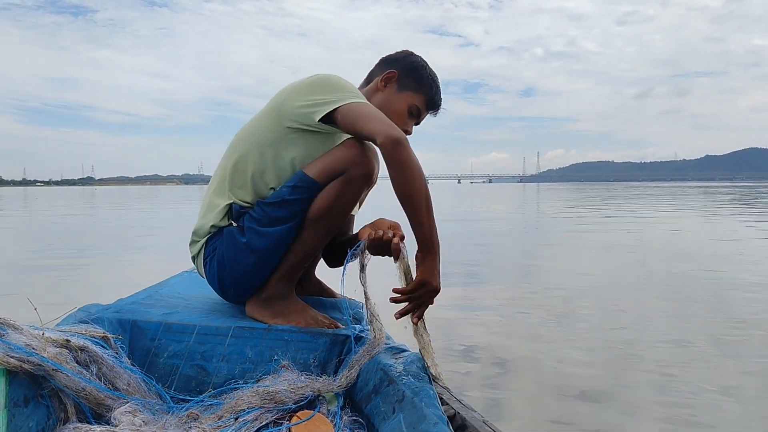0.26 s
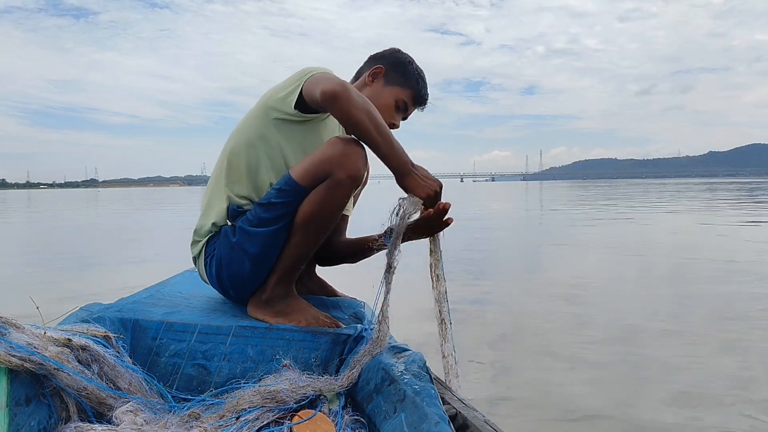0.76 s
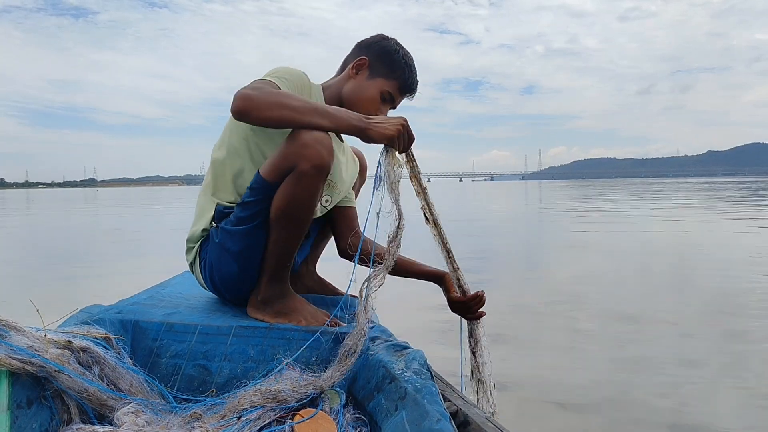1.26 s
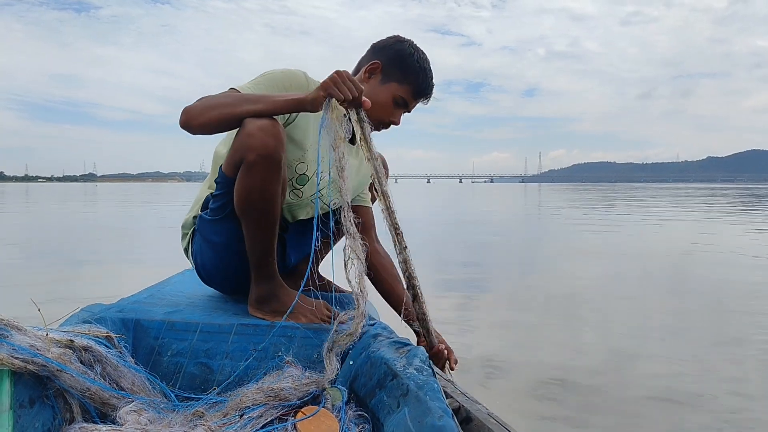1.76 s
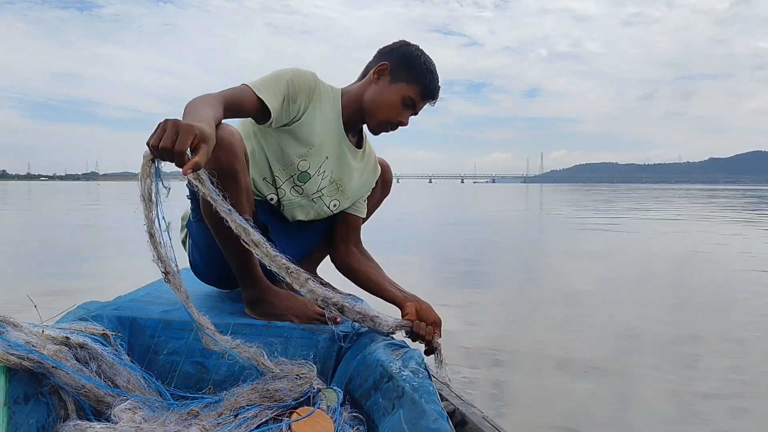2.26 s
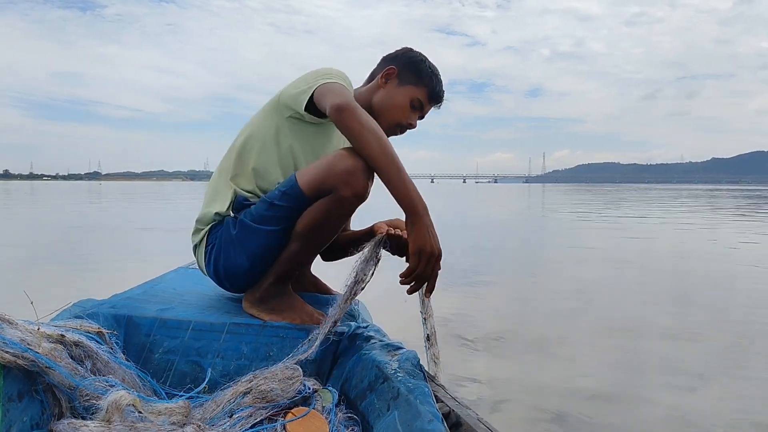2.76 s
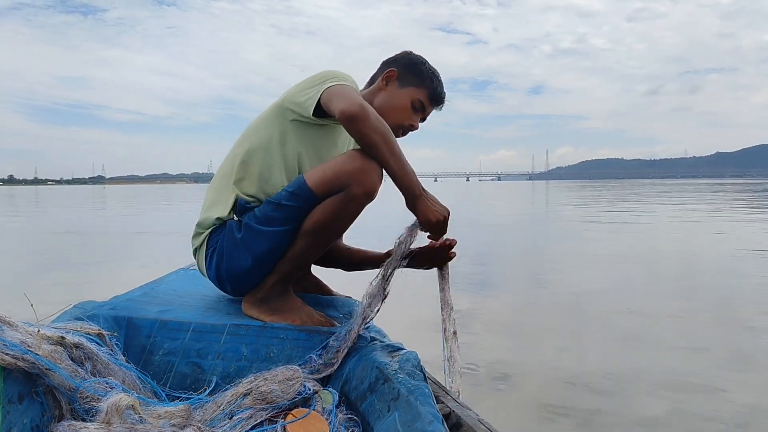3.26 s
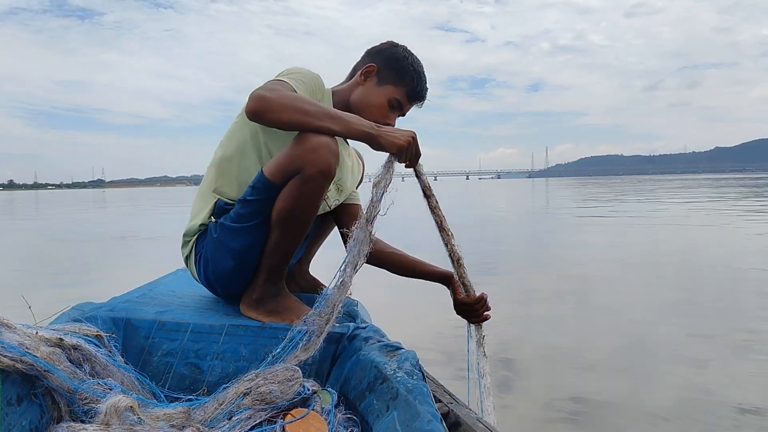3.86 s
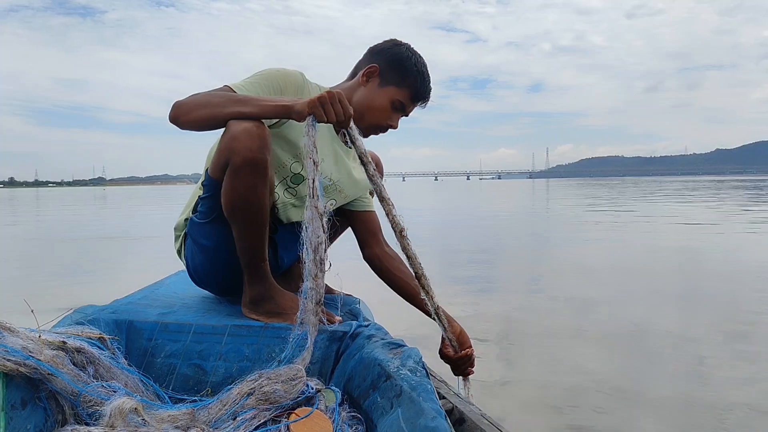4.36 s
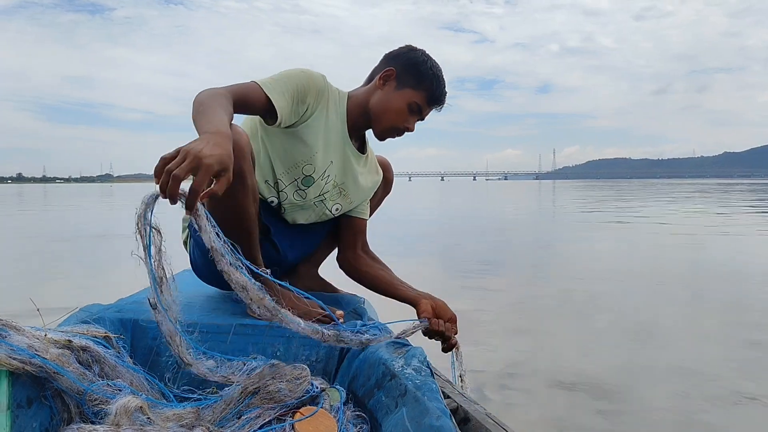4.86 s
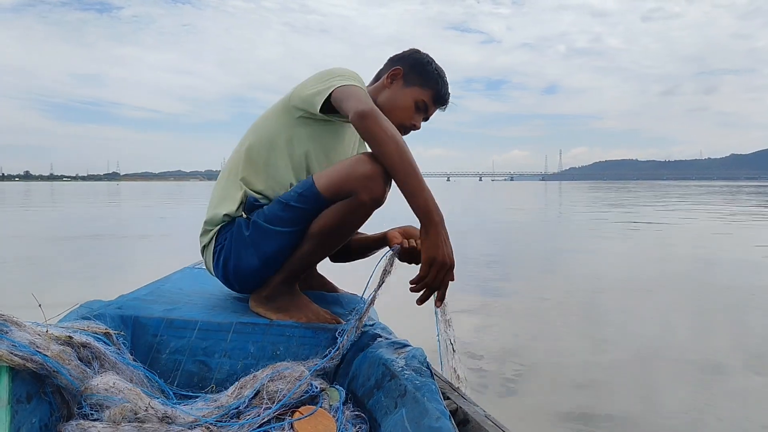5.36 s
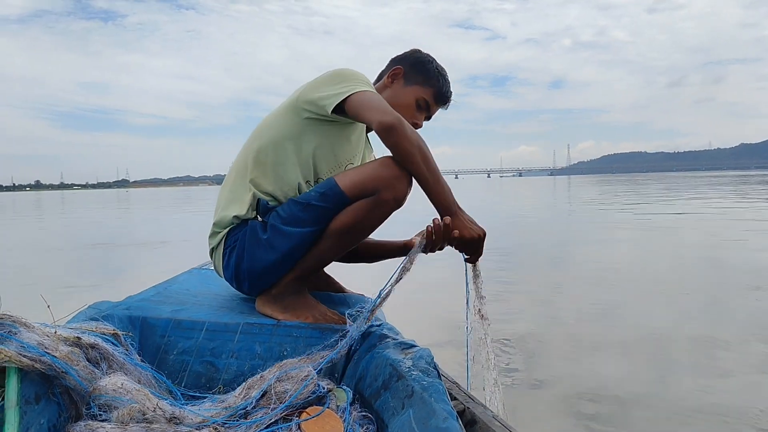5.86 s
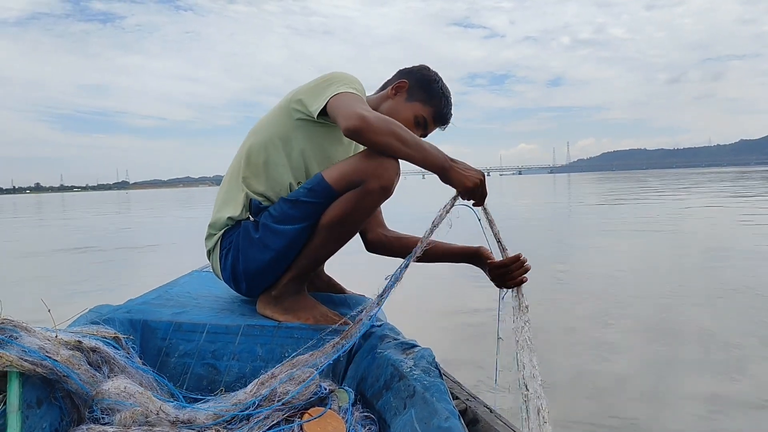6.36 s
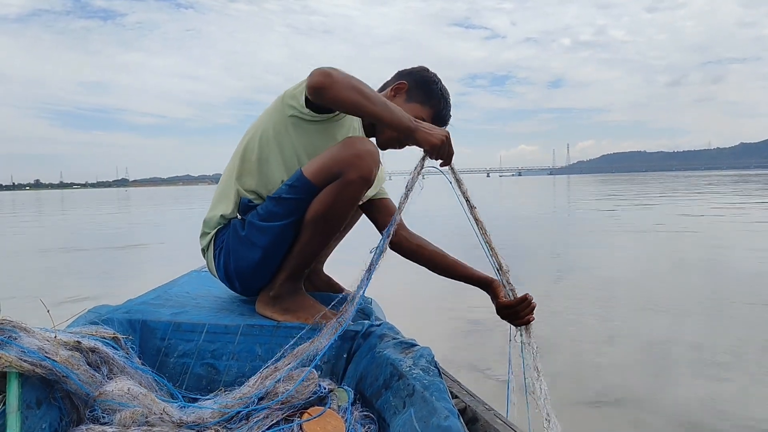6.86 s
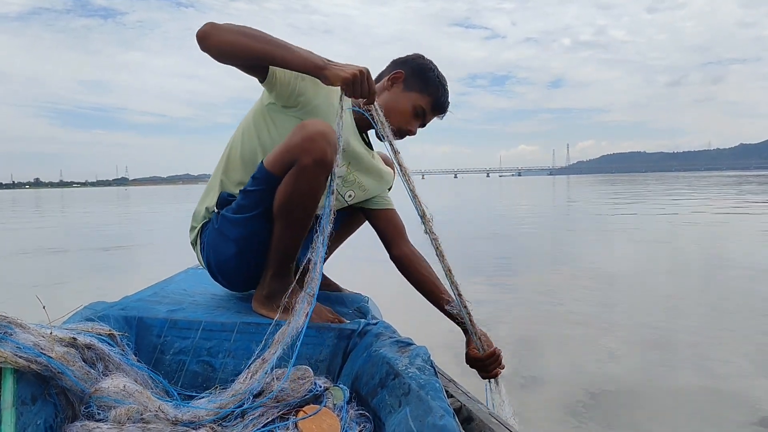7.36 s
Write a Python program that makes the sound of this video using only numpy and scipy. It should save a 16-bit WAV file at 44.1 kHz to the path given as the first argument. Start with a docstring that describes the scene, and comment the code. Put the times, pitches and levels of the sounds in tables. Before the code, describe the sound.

Outdoors on calm open water, close stereo microphone on a small wooden boat. A wet net is pulled in by hand: fine spray and mesh crackle rise and fall with each pull, and drips and bubbly plops cluster around two seconds. A soft hollow hull knock follows near three, then more trickling and a short rasp of cord on wood. A quieter lull ends with renewed drips and a fainter rasp. Steady low rumble and light deep breeze lie behind.

```python
"""Water draining as a random crowd of bursts from a wet net hauled by hand over the side of a wooden boat.
Mesh snaps and drops are short rings and noise puffs; bubbles and trickles are decaying tones of moving pitch.
The mesh swishes as gliding narrow-band noise; the cord's slips and the knocks excite plank and hull modes.
Behind them lie a light breeze of deep, band-passed pressure lumps and a far, steady rumble,
shaped noise partly alike at two spaced microphones."""
import sys
import numpy as np
from scipy import signal
from scipy.fft import rfft, irfft, next_fast_len
from scipy.io import wavfile
from scipy.ndimage import uniform_filter1d

SR = 44100
rng = np.random.default_rng(int(sys.argv[2]) if len(sys.argv) > 2 else 0)


def file_out(sig):
    """Save sig as 16-bit WAV at sys.argv[1]."""
    # one column per channel
    cols = np.atleast_2d(sig).T
    # limit, then scale
    lim = np.clip(cols, -1, 1)
    pcm = np.round(lim * 32767).astype(np.int16)
    wavfile.write(sys.argv[1], SR, pcm)


N = 335424  # length in samples


def gain_of(db):
    """Decibel law: amplitude ratio of a level in dB."""
    return 10 ** (np.asarray(db) / 20)


def evened(x):
    """Normalisation: scales a signal to unit root-mean-square."""
    return x / np.sqrt(np.mean(x ** 2) + 1e-20)


def read(points, hz):
    """Interpolation of a spectrum along logarithmic frequency."""
    f, value = np.transpose(points)
    return np.interp(np.log(hz + 1), np.log(f + 1), value)


def follow(rows):
    """Amplitude envelope: gain at every sample along a (t/s, level/dB) curve."""
    s, db = np.transpose(rows)
    return gain_of(np.interp(np.arange(N) / SR, s, db))


def joined(tables):
    """Concatenated envelopes: one (t/s, level/dB) curve, almost silent between its parts."""
    curve = []
    for rows in tables:
        before, after = (rows[0][0] - .02, -100), (rows[-1][0] + .02, -100)
        curve += [row[:2] for row in (before, *rows, after)]
    return curve


def add(mix, s, sound, pan_db):
    """Superposition: adds a sound at time s with a left-minus-right level difference."""
    part = mix[:, round(s * SR):][:, :sound.shape[-1]]
    part += gain_of([[pan_db / 2], [-pan_db / 2]]) * sound[..., :part.shape[1]]


def colour(x, points, lean):
    """Linear filtering: shapes a pair by a spectrum and a lean between the microphones."""
    size = next_fast_len(N)
    hz = np.fft.rfftfreq(size, 1 / SR)
    response_db = read(points, hz) + np.outer([.5, -.5], read(lean, hz))
    return irfft(rfft(x, size) * gain_of(response_db), size)[:, :N]


def band(x, hz, spread):
    """Resonant selection: twice a gentle band-pass, spread times above and below hz, then evened."""
    edges = signal.butter(1, [hz / spread, min(hz * spread, 20000)], "band", fs=SR)
    return evened(signal.lfilter(*edges, signal.lfilter(*edges, x)))


# water draining from the lifted mesh, also setting the crackle and stray drops: [t/s, level/dB]
DRAIN_LEVEL = [(0, -92), (.27, -84.5), (.34, -73.5), (.68, -84), (.8, -88), (.88, -78.5), (1.25, -74.5),
               (1.47, -76), (1.6, -85), (1.76, -75), (2.0, -77.5), (2.15, -82), (2.43, -85), (2.52, -78.5),
               (2.87, -88), (3.15, -86.5), (3.175, -76), (3.21, -84), (3.34, -87), (3.4, -79.5),
               (3.46, -86.5), (3.53, -84), (3.77, -78), (4.03, -80), (4.24, -82), (4.5, -74.5),
               (4.65, -71.5), (4.68, -86.5), (4.86, -81.5), (5.33, -85), (5.6, -90.5), (6.15, -90),
               (6.25, -87), (6.92, -82.5), (7.25, -83.5), (7.5, -77.5), (7.61, -88)]
# spectra of the fine spray and of the coarser spatter: [f/Hz, relative level per Hz/dB]
SPRAY_SPECTRUM = [(4000, -14), (6500, -4.5), (8000, -3.5), (10000, -5.5), (12500, -10), (16000, -27)]
SPATTER_SPECTRUM = [(2000, -6.5), (3000, -4), (3700, -3), (5000, -5.5), (6500, -4.5), (9000, -10.5)]
# lean of near sound between the microphones: [f/Hz, left minus right level/dB]
NEAR_LEAN = [(500, 4), (2000, 9), (5500, -2), (7500, -1.5), (9500, 14.5), (13000, 3.5)]
SPATTER_DB, SURGE_DB = 2, 1.2  # spatter against the spray; depth of the slow surges of both


def fizz():
    """Poisson process: thousands of tiny bursts a second, flickering as threads of water break."""
    out = 0
    for db, spectrum in (0, SPRAY_SPECTRUM), (SPATTER_DB, SPATTER_SPECTRUM):
        flicker_db = 1.4 * evened(uniform_filter1d(rng.standard_normal(N), size=300))
        surge_db = SURGE_DB * evened(uniform_filter1d(rng.standard_normal(N), size=2500))
        strength = gain_of(2.8 * np.minimum(rng.exponential(1, N), 5) + flicker_db)
        impulses = strength * (rng.random(N) < 1400 / SR)  # 1400 bursts/s in each layer
        shared, left, right = rng.standard_normal((3, N))
        noise = 0.4 * shared + np.array([left, right])
        bursts = colour(uniform_filter1d(impulses, size=40) * noise, spectrum, NEAR_LEAN)
        out = out + gain_of(db + surge_db) * bursts / np.std(bursts.mean(0))
    return follow(DRAIN_LEVEL) * out


# spectral weighting of the snapping mesh: [f/Hz, level/dB]
SNAP_SPECTRUM = [(3000, 1), (5000, 1.5), (7000, -4), (10000, -2), (14000, -6)]
# level against the drain curve in dB, snaps per second, cycles for a ring's envelope to fall by exp(-6)
CRACKLE_DB, CRACKLE_PER_S, CRACKLE_CYCLES = -4.5, 1200, 21


def crackle():
    """Impulse response: meshes snap open as short rings of scattered pitch, a few much louder."""
    out, t = np.zeros((2, N)), np.arange(400) / SR
    for hz in np.geomspace(3200, 13500, num=20):
        strength = gain_of(3.3 * np.minimum(rng.exponential(1, N), 4))
        snaps = strength * (rng.random(N) < CRACKLE_PER_S / 20 / SR)  # shared among 20 pitches
        sides = snaps * gain_of(2.8 * rng.standard_normal((2, N))) * rng.choice([-1., 1.], (2, N))
        envelope = t * hz * np.exp(-t * hz * 6 / CRACKLE_CYCLES)
        ring = envelope * np.sin(2 * np.pi * hz * t)
        out += signal.oaconvolve(sides, evened(ring)[None])[:, :N]
    out = colour(out, SNAP_SPECTRUM, NEAR_LEAN)
    return follow(DRAIN_LEVEL) * gain_of(CRACKLE_DB) * out / np.std(out.mean(0))


# small random drops: rate per second, level against the drain curve in dB, exponential spread in dB
STRAYS_PER_S, STRAY_DB, STRAY_SPREAD_DB = 40, -2.5, 1.5


def strays():
    """Random arrivals: rows of small ticks whose level follows the draining."""
    when, size, pitch, edge = rng.random((round(STRAYS_PER_S * N / SR), 4)).T
    s, hz = when * N / SR, 3500 * 3 ** pitch
    excess_db = -STRAY_SPREAD_DB * np.log(np.maximum(size, .15))
    db = np.interp(s, *np.transpose(DRAIN_LEVEL)) + STRAY_DB + excess_db
    return list(zip(s, db, hz, -8.0 * edge, .5 * read(NEAR_LEAN, hz)))


# drops striking water and deck:
# [t/s, level/dB, centre f/Hz, bright edge against the centre level/dB, left minus right level/dB]
DROP_TICKS = [(.337, -63.5, 10500, -13, 13), (0.8733, -69, 3600, 2, 7), (0.9064, -69.5, 3600, 4.5, 6),
              (1.0027, -63.5, 6100, -5, 1), (1.165, -65, 8250, -8, 5), (1.316, -59, 3670, -23, -11),
              (1.326, -56.5, 3640, -24, 7), (1.412, -63, 6500, -10, -1), (1.5277, -63, 3820, -9, 2),
              (1.6186, -57, 5000, -8, -3), (1.7169, -41, 4180, -8, -1), (1.7173, -45.5, 8600, -14, 3),
              (1.7176, -58, 15000, -20, 2), (1.7292, -66, 8800, -15, 3), (1.7639, -60, 4120, -13, -5),
              (1.844, -57.5, 3700, -10, -4), (1.851, -59.5, 5600, -20, -8), (1.886, -60, 6500, -16, -4),
              (1.928, -70, 6170, -2, -2), (2.0164, -68.5, 8050, 2, 6), (2.0597, -67, 6750, -8, -1),
              (2.177, -61, 3200, -9, 0), (2.1817, -73, 9300, -3, 3), (2.185, -63, 3100, -12, 0),
              (2.1895, -69, 6000, -6, -4), (2.192, -64, 2700, -12, 0), (2.197, -62, 5900, -14, -2),
              (2.202, -58, 3300, -14, -2), (2.2085, -64, 2900, 0, 0), (2.218, -62, 4400, -7, -3),
              (2.226, -67, 3100, -4, 0), (2.324, -71, 6000, -4, 0), (2.4566, -66, 6900, -4, -3),
              (2.504, -65, 10300, -8, 12), (2.789, -70, 5600, -15, 0), (2.908, -78, 9050, -12, 3),
              (2.972, -74, 8300, -10, 3), (3.0138, -72.5, 4970, 0, 2), (3.159, -80, 9500, -4, 5),
              (3.168, -71, 13500, -7, 3), (3.177, -79, 9400, -5, 5), (3.186, -73, 6800, -8, 3),
              (3.2, -76, 11000, -7, 5), (3.2495, -74, 6800, 5, -3), (3.2515, -66, 2800, -2, -8),
              (3.253, -64, 4450, -8, -11), (3.2524, -63, 5900, -6, -5), (3.257, -67, 4400, -2, -5),
              (3.2605, -65, 2700, -2, -2), (3.266, -71, 7500, -2, 2), (3.272, -69, 4500, -6, -2),
              (3.3517, -65, 14300, -13, 6), (3.3835, -72, 8070, -7, -1), (3.436, -67, 12000, -3, 2),
              (3.799, -60.5, 4740, -2, -4), (3.921, -60, 3560, -6, -2), (3.9697, -67, 8870, -7, 2),
              (4.0158, -65.5, 9400, -10, 10), (4.2807, -62, 6860, -12, -2), (4.296, -61, 4910, -14, -6),
              (4.347, -65, 4910, -2, -3), (4.407, -53.5, 5300, -25, -7), (4.4747, -46, 5450, -23, 1),
              (4.619, -51.5, 3670, -12, 1), (4.743, -62, 4170, -10, 3), (4.777, -60, 6540, -7, -1),
              (4.782, -58, 5050, -13, -5), (4.8183, -61.5, 4160, -3, 2), (5.3538, -53, 10900, 1.5, -2),
              (5.362, -62, 9800, -3, -11), (5.371, -63, 9790, -7, 4), (6.126, -77, 8140, 4, 5),
              (6.519, -69, 4400, -15, -3), (6.596, -68, 4900, -15, -3), (6.672, -70, 5800, -12, -3),
              (6.9286, -66.5, 9000, -11, 8), (7.016, -71, 4000, -10, 0), (7.037, -63, 4890, -13, -6),
              (7.094, -68, 5500, -10, -3), (7.1444, -70, 7970, 1, 3), (7.1565, -63, 7840, 3, -2),
              (7.532, -65.5, 8600, -8, 8), (7.563, -70, 5500, -2, 3)]
TICK_T60_S = 0.014


def drops():
    """Impact noise: a puff around its centre plus a bright edge, unlike in the two microphones."""
    out, t, ticks = np.zeros((2, N)), np.arange(1500) / SR, strays() + DROP_TICKS
    puffs = rng.standard_normal((len(ticks), 2, 1500))
    for (s, db, hz, edge_db, pan_db), puff in zip(ticks, puffs):
        puff[[0, 1], [8, 14]] += 8  # first contact is one sharp edge, a little later on the right
        edge = gain_of([[3], [-6]]) * band(puff, 8600, 1.32) + 0.36 * band(puff, 5000, 1.9)
        spread = 1.17 + .012 * max(db + 52, 0)  # a hard drop cracks over a wider band
        tick = band(puff, hz, spread) + gain_of(edge_db) * edge
        onset = np.minimum(t / .0002, 1)
        add(out, s, gain_of(db - 60 * t / TICK_T60_S) * tick * onset, pan_db)
    return out


BUBBLE_ROUGH = 0.22  # rms flutter of a ring, as a share of its amplitude


def bubble(hz, t60, rise, punch, rough):
    """Bubble resonance: a dying tone of moving pitch, with a falling plop where the drop hits hard."""
    t = np.arange(len(rough)) / SR
    settle = .35 * punch * np.exp(-t / .0013)
    # the rise reaches its stated share a third into the ring, and bends later for long rings
    drift = rise * np.minimum(3 * t / t60, 1.15) ** (1 + 22 * t60)
    turns = np.cumsum(hz * (1 + settle + drift)) / SR
    flutter = 1 + BUBBLE_ROUGH * band(rough, .15 * hz, 2.5)
    tone = gain_of(-60 * t / t60) * np.sin(2 * np.pi * turns) * flutter
    plop = .65 * punch * gain_of(-60 * t / .01) * band(rough, 1.4 * hz, 1.5)
    onset = np.minimum(t / (.003 - .0027 * punch), 1)
    return (tone * (1 + .6 * punch * np.exp(-t / .006)) + plop) * onset


# bubbles left by drops:
# [t/s, level/dB, base f/Hz, t60/s, pitch rise as a share (negative falls), left minus right level/dB]
BUBBLE_EVENTS = [(1.633, -53, 1430, 0.031, .05, -4), (1.633, -56, 2050, .015, .05, -2),
                 (1.676, -48.5, 1174, 0.041, 0.1, -2), (1.716, -50, 1790, .045, 0.1, -8),
                 (1.737, -54.5, 990, 0.04, -0.056, 5), (1.737, -54, 2150, 0.041, .1, -12),
                 (1.756, -51, 1850, 0.018, .2, -9), (1.765, -57, 2800, .02, .1, -5),
                 (1.781, -57, 2620, .025, 0.1, -5), (1.798, -55, 2290, 0.025, 0, -7),
                 (1.8, -55, 1630, 0.044, -0.2, -3), (1.812, -49, 2320, 0.014, 0.12, -11),
                 (1.822, -53, 2190, .02, -0.1, -7), (1.812, -55, 760, 0.083, .05, 3),
                 (1.84, -54, 1750, 0.02, 0.029, -5), (1.85, -55.5, 1600, 0.031, 0.6, -10),
                 (1.856, -52, 2090, 0.017, 0.04, -12), (1.873, -53, 1114, 0.062, 0.4, 1),
                 (1.886, -54, 2306, 0.028, 0.022, -19), (1.892, -59, 1950, .015, .05, -5),
                 (1.905, -53, 2430, .018, .05, -5), (1.905, -58, 1800, 0.013, .05, -5),
                 (1.914, -58, 1830, .032, 0.3, -9), (1.928, -58, 2610, .02, -0, -5),
                 (1.943, -64, 1390, .04, .05, 2), (1.955, -70, 3190, 0.036, .03, 0),
                 (1.965, -63, 1880, 0.049, .05, -1), (2.1965, -41.5, 3550, 0.012, 0.18, -3),
                 (2.199, -57, 2480, 0.025, .05, 0), (2.2085, -52, 1300, 0.013, -0.1, 8),
                 (2.745, -54, 2780, 0.02, .12, 3), (2.842, -53, 2720, 0.019, 0, 9),
                 (2.85, -60, 1435, .05, 0.6, 3), (3.852, -59, 1460, 0.049, .05, -9),
                 (3.887, -60, 1204, 0.054, .08, 13), (3.934, -56.5, 1610, 0.075, .05, 2),
                 (3.999, -70, 956, 0.037, .1, 3), (4.035, -55, 746, 0.058, -0, 1),
                 (4.057, -53.5, 682, 0.11, 0.21, 10), (4.16, -58, 616, 0.23, 0.092, 6),
                 (4.261, -58.5, 1430, 0.051, 0.5, -5), (4.274, -53, 2100, .04, .2, 0),
                 (4.283, -51, 2380, 0.032, -0, -6), (4.277, -56.5, 2690, 0.027, 0.46, 8),
                 (4.302, -58, 2040, .03, .05, 10), (4.327, -52, 1620, 0.019, 0.75, -7),
                 (4.347, -47.5, 931, 0.16, 0.7, 5), (4.364, -59.5, 1880, 0.063, 0.06, -13),
                 (4.436, -61, 1710, 0.056, .03, -10), (4.459, -47, 1020, 0.029, -0.47, 5),
                 (4.459, -51, 3060, 0.016, -0.025, 13), (4.546, -50.5, 567, 0.06, 0.3, 5),
                 (4.551, -56.5, 2050, .03, -0.03, -7), (4.56, -60, 910, 0.068, -0, 2),
                 (4.642, -50, 1130, 0.013, -0.1, 7), (4.758, -57, 1540, 0.074, 0.07, 0),
                 (4.795, -53, 620, 0.22, 0.27, 2), (5.049, -53.5, 1410, .014, .05, -7),
                 (5.059, -52.5, 1080, .05, 0.038, -1), (5.062, -58, 1800, .015, .1, -1),
                 (5.131, -53.5, 740, 0.053, -0.1, 3), (5.49, -60, 3300, 0.019, .05, 11),
                 (6.742, -56, 700, 0.07, 0.088, 9), (6.815, -58, 2540, 0.041, -.08, -10),
                 (6.83, -63, 2450, .04, 0.13, -9), (6.82, -67, 2100, .05, .1, -3),
                 (6.862, -58, 695, .03, .05, 3), (6.907, -54.5, 695, 0.05, 0.3, 5),
                 (6.943, -52.5, 1440, 0.011, -0.1, 3), (6.961, -56, 1620, 0.088, -0, 8),
                 (6.991, -64, 2100, .02, .05, 1), (7.014, -62, 1380, 0.022, .05, 0),
                 (7.03, -66, 1400, 0.04, .1, -1), (7.046, -61, 1600, 0.027, .1, 0),
                 (7.077, -51.5, 855, 0.014, .05, 2), (7.077, -55, 1510, 0.015, -0, 0),
                 (7.252, -53.5, 586, 0.1, 0.11, 4), (7.383, -55, 550, 0.035, -0, 0),
                 (7.562, -55, 1990, 0.021, 0.12, 9), (7.568, -61, 2700, .02, .05, 5)]


def bubbles():
    """Superposition of single resonators: every listed bubble, struck harder if loud and low."""
    out = np.zeros((2, N))
    roughs = rng.standard_normal((len(BUBBLE_EVENTS), 5000))
    for (s, db, hz, t60, rise, pan_db), rough in zip(BUBBLE_EVENTS, roughs):
        punch = np.clip((db + 58) / 10, .15, 1) * min(1, 1500 / hz)
        add(out, s, gain_of(db) * bubble(hz, t60, rise, punch, rough), pan_db)
    return out


# threads of water running back into the river, one table a gush: [t/s, level/dB]
TRICKLE_GUSHES = [
    [(1.62, -84), (1.686, -78), (1.74, -71), (1.85, -69), (1.92, -71), (2.05, -81)],
    [(2.7, -72), (2.9, -84)],
    [(3.82, -87), (3.9, -72), (4.1, -73), (4.28, -69), (4.4, -69.5), (4.48, -67.5), (4.6, -76), (4.72, -85)],
    [(4.75, -75), (4.95, -83), (5.06, -71), (5.2, -78)],
    [(6.75, -74), (6.85, -76), (6.964, -76), (7.12, -79)],
    [(7.3, -87), (7.45, -79), (7.58, -81)],
]


def trickle():
    """Random superposition: small overlapping bubbles, each pitch landing at random moments."""
    out = np.zeros((2, N))
    for hz in np.geomspace(850, 3400, num=18):
        strength = gain_of(3.0 * np.minimum(rng.exponential(1, (2, N)), 4))
        landings = strength * (rng.random((2, N)) < 45 / SR)
        ring = bubble(hz, 70 / hz, 0.12, 0.36, rng.standard_normal(2000))
        out += signal.oaconvolve(landings, ring[None])[:, :N]
    return follow(joined(TRICKLE_GUSHES)) * evened(out + 0.086 * out[::-1])


# wet mesh swishing through the fingers, one table a stroke: [t/s, level/dB, centre f/Hz]
SWISH_STROKES = [
    [(.53, -77, 3290), (.58, -79, 4330), (.69, -85, 4500)],
    [(.83, -77, 3840), (.9, -79, 3650), (1.0, -86, 3400), (1.04, -82, 3700), (1.13, -77, 3710),
     (1.2, -93, 3580)],
    [(1.93, -74, 6200), (1.95, -77, 5800), (1.975, -70, 5570), (2.0, -73, 5810), (2.04, -77, 6000),
     (2.06, -84, 6140)],
]


def swish():
    """Quadrature modulation: low-passed noise rides on a gliding centre, louder on the right."""
    s, _, hz = np.transpose([row for stroke in SWISH_STROKES for row in stroke])
    turns = np.cumsum(np.interp(np.arange(N) / SR, s, hz)) / SR
    slow = signal.lfilter(*signal.butter(2, 320, fs=SR), rng.standard_normal((2, 2, N)))
    slow = slow * gain_of(1.4 * evened(uniform_filter1d(rng.standard_normal(N), size=400)))
    hiss = slow[0] * np.cos(2 * np.pi * turns) + slow[1] * np.sin(2 * np.pi * turns)
    return gain_of([[-1.5], [2.5]]) * follow(joined(SWISH_STROKES)) * evened(hiss)


# modes of the gunwale's edge plank: [f/Hz, bandwidth/Hz, level/dB]
GUNWALE_MODES = [(2560, 150, -1), (2800, 390, -1), (3010, 160, -1.5), (3500, 550, -3)]


def plank(spot, upper_db):
    """Modal ringing of the edge plank, a little higher or lower at each spot along it."""
    t = np.arange(1500) / SR
    ring = 0
    for k, (hz, width, db) in enumerate(GUNWALE_MODES):
        level = (-1) ** k * gain_of(db + upper_db * (k > 0))  # alternate modes start in opposite sense
        tone = np.sin(2 * np.pi * hz * (1 + 0.022 * spot) * t)
        ring = ring + level * np.exp(-np.pi * width * t) * tone
    return ring * np.minimum(t / 0.00039, 1)


# cord rasping over the gunwale, one table a pull: [t/s, level/dB]
RASP_PULLS = [
    [(4.495, -84), (4.506, -74), (4.52, -77), (4.545, -72), (4.585, -77), (4.61, -65), (4.635, -60),
     (4.655, -62), (4.668, -83), (4.68, -77), (4.69, -87)],
    [(7.415, -89), (7.421, -79), (7.44, -88), (7.468, -76), (7.485, -78), (7.505, -66), (7.525, -76),
     (7.535, -75), (7.55, -87)],
]
# single hard slips of a knot: [t/s, level/dB, left minus right level/dB, upper plank modes level/dB,
# spot along the plank (low -1 to high +1 and beyond)]
KNOT_SLIPS = [(4.5044, -58, 2, -6, 0), (4.51, -55, 3, -4, -2.5), (4.5234, -58, 2.5, -12, -1.2),
              (4.5334, -60, 3.5, -10, -.6), (4.5451, -55, 0, -12, -.3), (4.5685, -55, 1, -8, 0),
              (4.5854, -60, .5, -10, -2), (4.5954, -57, 1, 1, 2), (4.6069, -55, 1, 0, -1),
              (4.6104, -50, 2, -12, 1), (4.6187, -51, 0, 2, -0.5), (4.6238, -51, .5, 0, -2),
              (4.633, -47, 2, -5, -1), (4.6434, -53, 4.5, 6, 3), (4.648, -55, 2, 5, 0),
              (4.6574, -59, 2.5, 3, 1), (4.6763, -64, 2, 2, .3), (7.42, -61, 7, 0, 1.5),
              (7.4324, -65, 4, -3, 3), (7.4659, -63, 4.5, -5, 3.5), (7.4714, -65, 2.5, -3, 2),
              (7.4844, -66, 4.5, -2, 4), (7.4964, -61, 4, -3, 4), (7.5023, -59, 2.5, 0, 3),
              (7.509, -61, 3, -2, 3.5), (7.5154, -61, 3, -4, 5), (7.524, -65, 2, -4, -1.5),
              (7.5308, -60, 1.5, 2, -2), (7.5354, -63, 1.5, 1, -.6)]


def rasp():
    """Stick-slip excitation: uneven cord slips ring the plank; the hardest stand out one by one."""
    out = np.zeros((2, N))
    for spot in np.linspace(-1, 1, num=5):
        strength = gain_of(3.2 * np.minimum(rng.exponential(1, (2, N)), 4))
        slips = strength * (rng.random((2, N)) < 110 / SR)
        slips = slips * rng.choice([-1., 1.], (2, N))
        out += signal.oaconvolve(slips + 0.4 * slips[::-1], plank(spot, 0)[None])[:, :N]
    out = follow(joined(RASP_PULLS)) * evened(out)
    for s, db, pan_db, upper_db, spot in KNOT_SLIPS:
        add(out, s, gain_of(db) * plank(spot, upper_db), pan_db)
    return out


# blows of a weight on the hull: [t/s, strength level/dB, contact time/s, scuff level/dB]
HULL_KNOCKS = [(2.8025, -44, 0.0034, -74), (2.8085, -39, 0.0025, -76), (2.8145, -41.5, 0.0024, -82),
               (2.8172, -29.5, 0.0053, -82), (2.826, -35.5, 0.0023, -85), (2.839, -46.5, 0.002, -76),
               (3.249, -53.5, 0.0011, -60.5), (3.255, -51, 0.00071, -71), (6.221, -46.5, 0.0013, -77)]
# modes of the hull: [f/Hz, level/dB, t60/s]
HULL_MODES = [(76.2, -6, 0.96), (142, -4, 0.58), (175, 13, 0.028), (313, -2.5, 0.15), (402, 5.5, 0.11),
              (500, 7, 0.026), (706, -4.5, 0.14), (812, -2.5, 0.079), (1300, -40, .04), (2350, -24, .04)]


def knocks():
    """Modal excitation by a half-sine push: longer contact wakes only low modes; wet wood scuffs."""
    out, t = np.zeros((2, N)), np.arange(12000) / SR
    hull = sum(gain_of(db - 60 * t / t60) * np.sin(2 * np.pi * hz * t) for hz, db, t60 in HULL_MODES)
    hull = signal.lfilter(*signal.butter(2, 70, "high", fs=SR), hull)  # thin planks radiate no deep bass
    grits = rng.standard_normal((len(HULL_KNOCKS), 12000))
    for (s, db, contact, scuff_db), grit in zip(HULL_KNOCKS, grits):
        push = np.sin(np.pi * np.clip(t[:800] / contact, 0, 1))
        add(out, s, gain_of(db) * np.convolve(hull, push / push.sum()), 4.5)
        add(out, s, gain_of(scuff_db - 60 * t / 0.19) * band(grit, 1000, 2.3), 1.5)
    return out


# breeze on the microphones: [t/s, level/dB]
WIND_LEVEL = [(0, -54), (2, -53.5), (4, -53.5), (6.3, -51.5), (7, -48.5), (7.61, -46.5)]


def wind():
    """Partial coherence: slow lumps of air pressure, partly shared and stronger on the left."""
    lumps = rng.standard_normal((3, N))
    deep_band = signal.butter(2, [24, 45], "band", fs=SR, output="sos")
    air = signal.sosfilt(deep_band, lumps[1:] + 0.79 * lumps[0])
    return gain_of([[3.5], [-3.5]]) * follow(WIND_LEVEL) * evened(air)


# spectrum of the far wash: [f/Hz, relative level per Hz/dB]
RUMBLE_SPECTRUM = [(13, -29), (22, -8), (42, -19), (58, 1.5), (80, -1.5), (120, -5), (140, -3), (200, -9),
                   (233, -10), (273, -15.5), (404, -18), (474, -19.5), (572, -27), (750, -29), (1400, -38),
                   (2000, -40.5), (3500, -49), (9000, -58.5), (16000, -57.5)]
# likeness of far sound at the two microphones: [f/Hz, left-right correlation]
FAR_LIKENESS = [(25, 0.68), (60, 0.94), (160, 0.96), (270, 0.96), (450, 0.58), (740, -0.02), (1220, -0.35),
                (2000, 0.03), (15000, -0.039)]
# lean of far sound between the microphones: [f/Hz, left minus right level/dB]
FAR_LEAN = [(60, 4), (180, 4.5), (550, 3.5), (1650, -0.5), (4970, -3), (15000, 0.5)]
RUMBLE_DB = -45  # rms of the mean of both microphones


def rumble():
    """Spatial coherence: far traffic and water, alike on both sides in the bass, in drifting patches."""
    frames, hz = N // 512 + 5, np.fft.rfftfreq(2048, 1 / SR)
    a, b, c, d, patches = rng.standard_normal((frames, 1025, 5)).T
    patches = uniform_filter1d(patches, size=5, axis=0)
    patches = evened(uniform_filter1d(patches, size=12, axis=1))
    same = np.clip(read(FAR_LIKENESS, hz), -1, 1)[:, None]
    left, other = a + 1j * b, c + 1j * d
    right = same * left + np.sqrt(1 - same ** 2) * other
    spectra = np.array([left, right]) * gain_of(1.14 * patches)
    noise = signal.istft(spectra, nperseg=2048, noverlap=1536)[1][:, :N]
    wash = colour(noise, RUMBLE_SPECTRUM, FAR_LEAN)
    return gain_of(RUMBLE_DB) * wash / np.std(wash.mean(0))


def scatter(sound):
    """Diffuse reflection: short scatter off the deck, the crouching body and the water surface."""
    t = np.arange(2000) / SR
    response = rng.standard_normal((2, 2000)) * gain_of(-60 * t / 0.032) * (t > .001)
    return signal.oaconvolve(sound, response / np.linalg.norm(response[0]), axes=1)[:, :N]


def scene():
    """Linear superposition of all sources and the near scatter."""
    near, plops = drops() + trickle() + rasp() + swish(), bubbles()
    echo = scatter(near + 0.85 * plops)
    water = gain_of(-0.5) * fizz() + crackle() + near + gain_of(-0.1) * plops
    return water + gain_of(-4.0) * echo + knocks() + wind() + rumble()


EDGE_HZ = 15900


def record(dry):
    """Band limitation: a symmetric low-pass removes the treble above its edge."""
    low_pass = signal.firwin(511, EDGE_HZ, window=("kaiser", 9), fs=SR)
    return signal.oaconvolve(dry, low_pass[None], "same")


dry = scene()
out = record(dry)
file_out(out)
```